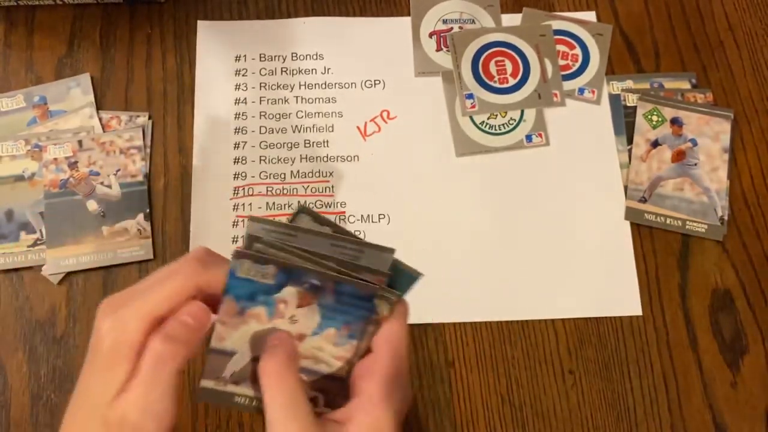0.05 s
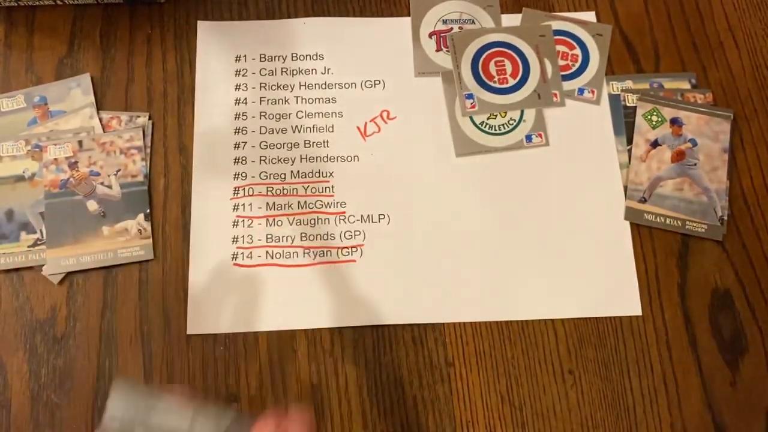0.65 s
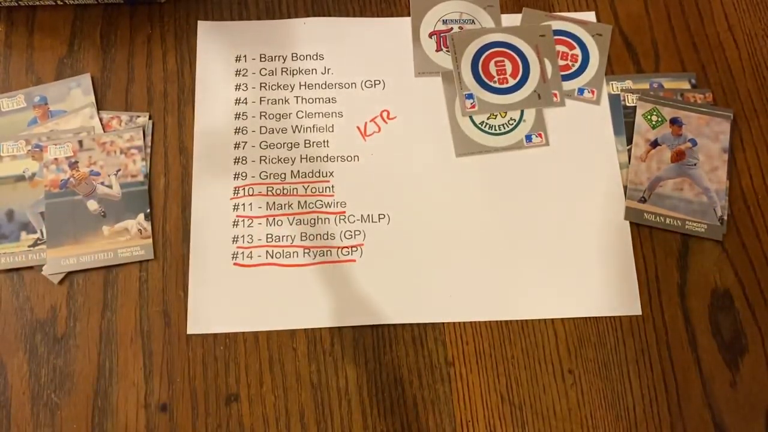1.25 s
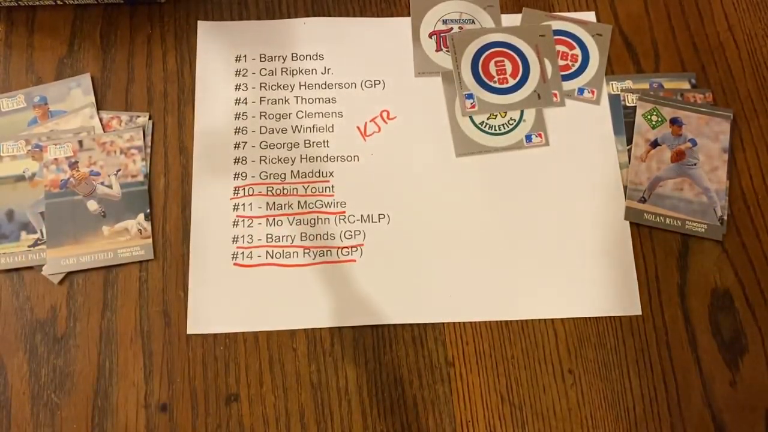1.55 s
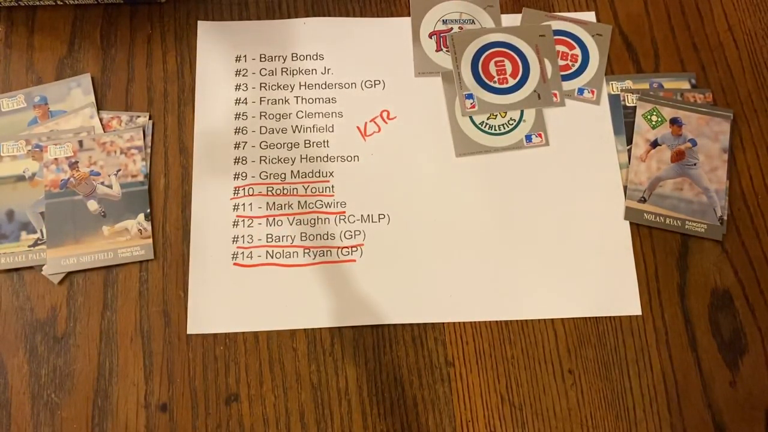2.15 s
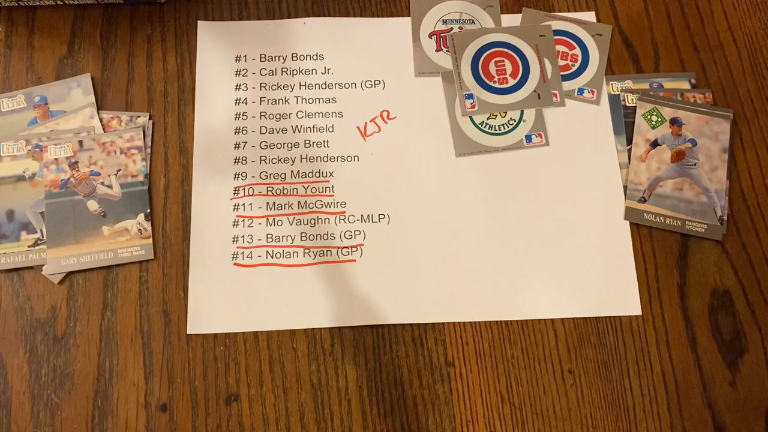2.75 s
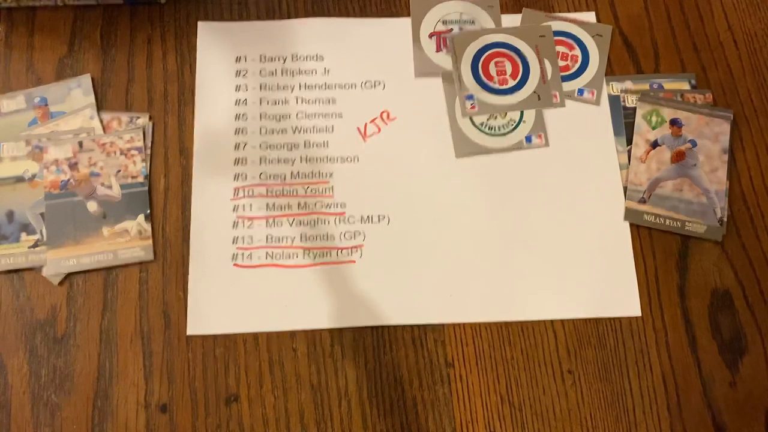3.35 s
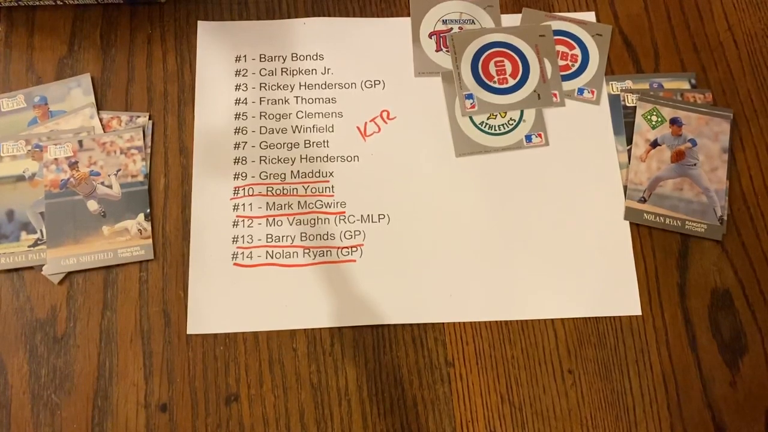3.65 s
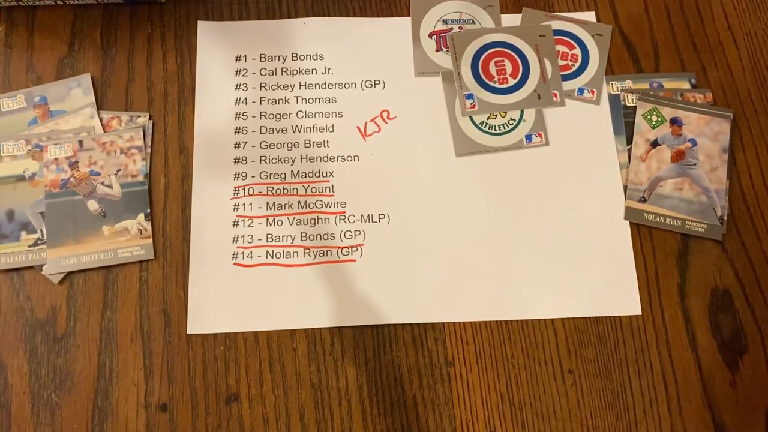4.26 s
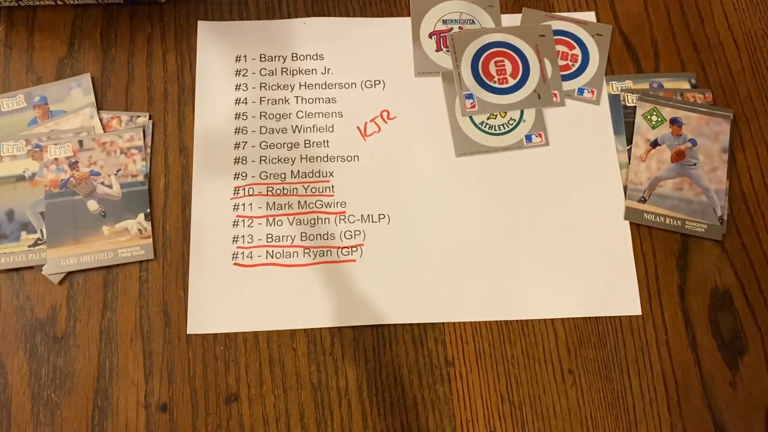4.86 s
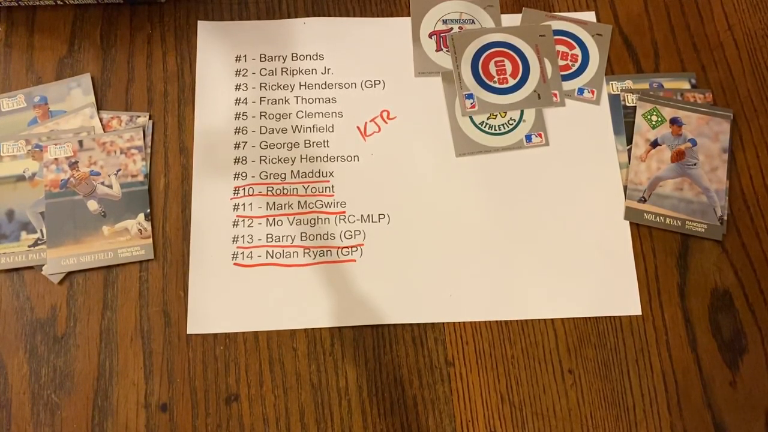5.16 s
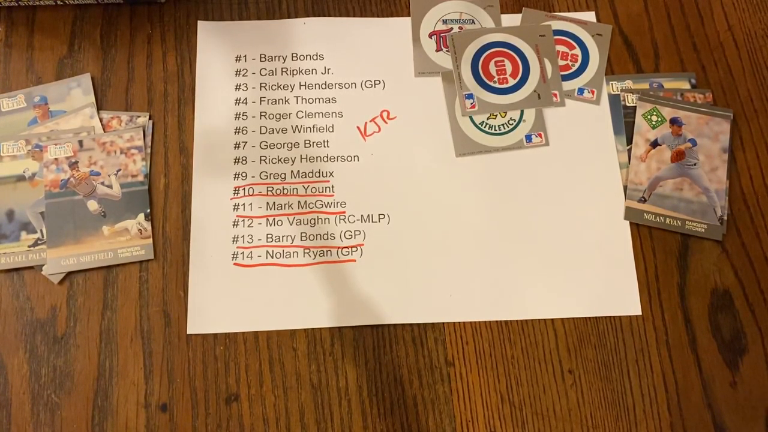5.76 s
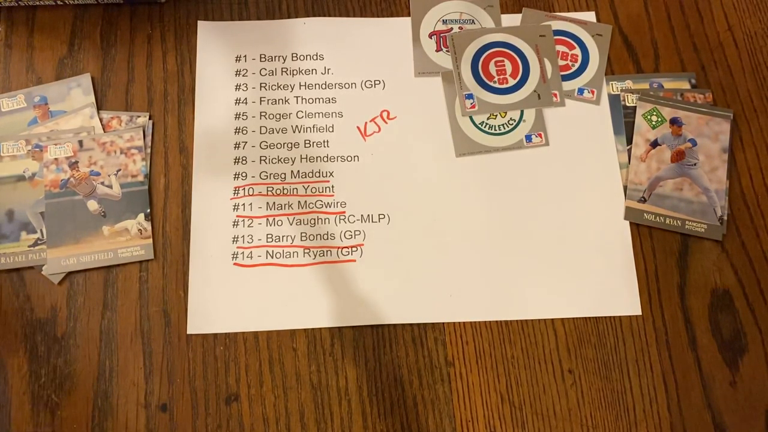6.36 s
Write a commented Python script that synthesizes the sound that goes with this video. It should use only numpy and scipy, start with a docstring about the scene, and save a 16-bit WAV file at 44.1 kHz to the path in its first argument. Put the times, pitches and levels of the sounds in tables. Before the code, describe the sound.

In a small, quiet room, stiff cards rub, scuff and flick against each other close to the microphone. The handling nearly stops, then a stack is put down on a wooden table twice: first with a dull, heavy thud, about a second later with a sharp knock. Cards go on sliding and snapping to the end, over a faint rumble from hands resting on the table.

```python
"""Trading cards are leafed through by hand over a wooden table in a small room.
From the start, faces slide with a stick-slip hiss and bent edges scuff and snap free.
Pushes on the table soon join in, carried through a stand as low thumps. After a lull,
a stack is set down near 3.2 s and again near 4.4 s, its sharp knock ringing the table top.
The leafing then goes on to the end."""
import sys
import numpy as np
from scipy import signal
from scipy.io import wavfile

SR = 44100
rng = np.random.default_rng(int(sys.argv[2]) if len(sys.argv) > 2 else 0)


def wav_record(signal):
    """Record a signal, one row per channel, as 16-bit PCM in the file named by sys.argv[1]."""
    frames = np.transpose(np.atleast_2d(signal))
    bounded = np.clip(frames, -1, 1)
    # unit amplitude maps onto the largest positive 16-bit level
    quanta = np.round(bounded * 32767).astype(np.int16)
    wavfile.write(sys.argv[1], SR, quanta)


N = 287309


def amp(db):
    """Converts decibels to an amplitude ratio."""
    return 10 ** (np.asarray(db) / 20)


def unit(x):
    """Normalises to rms 1."""
    return x / np.sqrt(np.mean(x ** 2) + 1e-20)


def read(points, hz):
    """Interpolates a table on a log-frequency axis."""
    f, value = np.transpose(points)
    return np.interp(np.log(hz + 1), np.log(f + 1), value)


def add(mix, s, sound):
    """Superposition: mixes a sound in at time s."""
    part = mix[max(round(s * SR), 0):][:len(sound)]
    part += sound[:len(part)]


def colour(x, spectrum, size=8192):
    """Minimum-phase filtering: imposes a spectral shape with a response of unit energy."""
    log_gain = np.log(amp(read(spectrum, abs(np.fft.fftfreq(size, 1 / SR)))))
    response = np.exp(np.conj(signal.hilbert(log_gain)))
    taps = np.fft.ifft(response).real[:size // 2]
    return signal.oaconvolve(x, taps / np.linalg.norm(taps))[:len(x)]


def resonate(x, hz, width_hz):
    """Resonance by heterodyning: shifts hz down to zero, smooths twice, shifts back."""
    carrier = np.exp(2j * np.pi * hz * np.arange(len(x)) / SR)
    pole = np.exp(-np.pi * width_hz / SR)
    return (carrier * signal.sosfilt([[1, 0, 0, 1, -pole, 0.0013]] * 2, x / carrier)).real


def grains(per_s, spread_db):
    """Shot noise: paper fibres slip in random clicks, a few much larger than the rest."""
    size = amp(spread_db * np.minimum(rng.exponential(1, N), 4))
    return unit(size * rng.choice([-1, 1], N) * (rng.random(N) < per_s / SR))


def stroke(length_s):
    """Velocity envelope of a short hand movement: quick swell, slower end."""
    return unit(np.sin(np.pi * np.linspace(0, 1, round(length_s * SR)) ** 0.38))


# spectrum of the room noise: frequency_hz, level_db
AMBIENT_SPECTRUM = [(20, -1.5), (40, -4), (75, -15.5), (110, -19.5), (180, -23.5), (400, -27.5), (825, -32),
                    (1600, -37.5), (3000, -41.5), (5600, -41), (9000, -45.5), (14000, -47.5), (16000, -57)]


def ambient_noise(level_db=-63.5):
    """Stationary noise: the room's quiet background, strongest in the bass."""
    return amp(level_db) * colour(rng.standard_normal(N), AMBIENT_SPECTRUM)


# spectrum of the table under resting hands: frequency_hz, level_db
RUMBLE_SPECTRUM = [(15, -27.5), (30, 7), (45, -3.5), (60, 5), (80, -12.5), (110, -2.5), (140, -30.5),
                   (250, -35.5), (600, -37), (2000, -60.5)]
# hands rest on the table: start_s, end_s
HAND_RESTS = [(0.0, 0.44), (3.2, 8)]


def resting_hands(level_db=-4, rest_db=-51.5, shift_db=-38.5, settle_t60_s=1.35, lift_s=0.06):
    """Random forcing: resting hands stir the table, more as they shift and settle after each push."""
    t = np.arange(N) / SR
    power = np.full(N, amp(rest_db) ** 2)
    settling = amp(-60 * t / settle_t60_s)
    for s, push_db, _ in PUSHES:
        add(power, s, (amp(shift_db + 0.3 * push_db) * settling) ** 2)
    contact = sum(np.clip(np.minimum(t - start, end - t) / lift_s + 1, 0, 1) for start, end in HAND_RESTS)
    return amp(level_db) * contact * np.sqrt(power) * colour(rng.standard_normal(N), RUMBLE_SPECTRUM)


# spectra of a sliding edge and of a card face: frequency_hz, level_db
HISS_SPECTRUM = [(200, -45), (1500, -20), (3000, -9.5), (4200, -0.5), (5500, 4), (7500, -8.5),
                 (10000, -16.5), (13000, -22), (16000, -38)]
FACE_SPECTRUM = [(100, -41), (400, -14), (900, -2), (1400, 2), (1900, 3.5), (2700, 1.5), (4000, -3),
                 (8000, -35), (16000, -56)]
# cards slide on each other: start_s, length_s, edge_hiss_db, face_rub_db
CARD_SLIDES = [(0.0, 0.037, -62.5, -64), (0.199, 0.21, -84, -69.5), (0.425, .22, -78, -74),
               (0.658, 0.34, -65, -66.5), (1.736, 0.4, -72.5, -75.5), (2.847, 0.14, -77, -79),
               (2.981, 0.068, -60.5, -86), (3.063, 0.096, -70, -61), (3.355, 0.17, -56.5, -69),
               (3.571, 0.23, -59, -58), (3.876, 0.15, -58.5, -61.5), (4.722, 0.19, -73, -70.5),
               (5.188, .16, -66, -67), (5.331, 0.27, -66.5, -75.5), (5.66, 0.14, -70, -63.5),
               (5.83, .11, -57.5, -61.5), (6.079, .16, -63, -70), (6.429, 0.11, -76, -65)]


def slides(level_db=-5, attack_s=0.0039, sag_db_per_s=-18.5, release_s=0.036):
    """Stick-slip friction: edges hiss and faces rub more dully as each slide starts, slows and stops."""
    hiss, rub = np.zeros((2, N))
    for s, length, edge_db, face_db in CARD_SLIDES:
        t = np.arange(0, length + release_s, 1 / SR)
        attack = np.minimum(t / attack_s, 1)
        release = np.minimum(1 - (t - length) / release_s, 1)
        speed = attack * release * amp(sag_db_per_s * t)
        add(hiss, s, amp(edge_db + level_db) * speed)
        add(rub, s, amp(face_db + level_db) * speed)
    hiss *= grains(per_s=7800, spread_db=4.5)
    rub *= grains(per_s=2000, spread_db=3)
    return colour(hiss, HISS_SPECTRUM) + colour(rub, FACE_SPECTRUM)


def catches(count=2, above_slide_db=14, range_db=7.5, chatter_db=-5):
    """Intermittent sticking: sliding edges catch at random, giving extra rows for snaps()."""
    rows = []
    for s, length, edge_db, face_db in CARD_SLIDES:
        loudest_db = max(edge_db, face_db) + above_slide_db
        for when, softness in rng.random((count, 2)):
            rows.append((s + length * when, loudest_db - range_db * softness, chatter_db))
    return rows


# spectrum of a card edge: frequency_hz, level_db
EDGE_SPECTRUM = [(200, -46), (1000, -31.5), (2500, -9), (4000, 3), (5600, 3.5), (7500, 2.5), (10000, -6),
                 (13000, -16.5), (16000, -21.5)]


def scuffs(length_s=0.019, edge_db=-8, face_db=-12):
    """Friction before release: an edge brushes along the next card, swelling into its snap."""
    speed = np.zeros(N)
    swell = np.linspace(0, 1, round(length_s * SR))
    for s, snap_db, _ in EDGE_SNAPS:
        relative_db = -19.5 - 0.58 * (snap_db - USUAL_SNAP_DB)  # further below a harder snap
        add(speed, s - length_s, amp(snap_db + relative_db) * swell)
    slips = speed * grains(per_s=6800, spread_db=3)
    return amp(edge_db) * colour(slips, EDGE_SPECTRUM) + amp(face_db) * colour(slips, FACE_SPECTRUM)


# spectrum of gliding glossy faces: frequency_hz, level_db
GLOSS_SPECTRUM = [(300, -47), (2000, -11.5), (4000, -2), (6000, 1), (8000, -0.5), (10000, -7),
                  (13000, -11.5), (16000, -23)]
# one card glides quickly off the next: start_s, level_db, length_s
CARD_SWISHES = [(0.121, -60, 0.05), (0.195, -61, 0.025), (0.76, -55, 0.032), (0.829, -57.5, 0.033),
                (1.124, -45.5, 0.011), (1.746, -74, 0.02), (1.9, -75.5, 0.049), (2.214, -75.5, .057),
                (2.629, -72.5, 0.031), (3.054, -56, 0.12), (3.18, -51, .043), (3.43, -55, 0.039),
                (3.553, -59.5, 0.12), (3.72, -59, 0.04), (5.226, -64.5, 0.038), (5.711, -62, 0.041),
                (6.06, -53, 0.023)]


def swishes(level_db=-3):
    """Microslip: glossy faces glide apart in very uneven slips, giving a fine, bright crackle."""
    speed = np.zeros(N)
    for s, db, length in CARD_SWISHES:
        add(speed, s, amp(db + level_db) * stroke(length))
    return colour(speed * grains(per_s=5000, spread_db=14), GLOSS_SPECTRUM)


# a card edge snaps free: start_s, level_db, relative_chatter_db
EDGE_SNAPS = [(.127, -44, -8), (0.233, -44.5, -17), (.296, -42.5, -11), (.652, -41, -25), (0.696, -44, -11),
              (.766, -49, -15), (.923, -43.5, -9), (0.931, -35, -4), (1.108, -45, 0), (1.124, -39.5, -6),
              (1.132, -32, -10), (1.251, -49.5, -17), (1.555, -70, 2), (1.728, -58, 0.5), (2.684, -67, -13),
              (2.814, -67.5, -16), (2.971, -39.5, -2), (3.066, -35.5, -12), (3.121, -39, -10),
              (3.19, -30, 0.5), (3.355, -41, 4.5), (3.409, -41.5, -6), (3.455, -42.5, 2),
              (3.650, -42.5, -3), (3.739, -46, -18), (3.754, -39, 1.5), (3.835, -42, -1.5),
              (3.941, -35.5, -5), (4.162, -53.5, -1), (4.298, -60, 10), (4.377, -41, -4),
              (4.411, -28.5, -2.5), (4.835, -47.5, -3.5), (5.006, -50.5, -1.5), (5.081, -38, -14),
              (5.196, -47, -10), (5.243, -45.5, -16), (5.663, -54.5, -3), (5.727, -46, -12),
              (5.787, -41, -21), (5.827, -37.5, -4), (5.896, -34, -15), (6.031, -37, -7), (6.044, -36, -14),
              (6.074, -34.5, -2.5), (6.249, -52, 4.5), (6.38, -51, -8), (6.419, -46, -13), (6.442, -47, -4)]
USUAL_SNAP_DB = -42.5


def snaps(level_db=15, crack_db=-2, crack_t60_s=0.0036, chatter_t60_s=0.026, flex_t60_s=0.016,
          ping_db=-3, ping_hz=5600, ping_s=0.00017):
    """Elastic release: the edge cracks and pings; the face shudders and chatters on its neighbours."""
    t = np.arange(SR // 6) / SR
    edge, face, pings = np.zeros((3, N))
    slips = grains(per_s=4200, spread_db=1.5)
    for s, db, chatter_db in EDGE_SNAPS + catches():
        size = amp(db + level_db) / np.sqrt(len(t))
        crack = unit(np.sign(rng.standard_normal(len(t))) * amp(-60 * t / crack_t60_s))
        shudder = unit(rng.standard_normal(len(t)) * amp(-60 * t / flex_t60_s))
        hz = ping_hz * 2 ** rng.uniform(-0.18, 0.18)  # each edge has its own pitch
        ping = unit(t * np.exp(-t / ping_s) * np.sin(2 * np.pi * hz * t))
        contacts = np.roll(slips, -round(s * SR))[:len(t)]
        chatter = amp(chatter_db) * unit(contacts * amp(-60 * t / chatter_t60_s))
        # hard, clean flicks are thin and bright; soft, chattering ones have more body
        flex_db = -7.5 - 0.14 * (db - USUAL_SNAP_DB) + 0.41 * chatter_db
        add(pings, s, size * amp(ping_db) * ping)
        add(edge, s, size * (amp(crack_db) * crack + chatter))
        add(face, s, size * amp(flex_db) * (shudder - chatter))
    return colour(edge, EDGE_SPECTRUM) + colour(face, FACE_SPECTRUM) + pings


# a card or finger drags on a bent card: start_s, level_db, pitch_hz, length_s
CARD_SCRAPES = [(0.198, -71, 2240, .05), (0.344, -71, 303, 0.053), (0.44, -68, 1100, 0.036),
                (0.664, -69, 1560, 0.026), (.841, -62.5, 2050, 0.037), (1.127, -59, 810, 0.051),
                (1.356, -75, 405, 0.076), (1.591, -75.5, 1520, 0.083), (3.058, -51.5, 1900, 0.041),
                (3.357, -55.5, 2400, 0.028), (3.426, -63.5, 990, .078), (3.648, -49, 2600, 0.038),
                (3.748, -55.5, 1260, 0.032), (3.916, -59.5, 1690, 0.032), (3.937, -47.5, 2040, 0.037),
                (5.82, -66, 560, 0.05), (6.043, -58, 1690, 0.065), (6.066, -56.5, 334, 0.029),
                (6.157, -70.5, 1770, 0.26), (6.429, -59, 2130, 0.071)]


def scrapes(level_db=-4, least_width_hz=166, width_share=0.28):
    """Friction-driven resonance: a short drag excites one mode of the bent card, wider when higher."""
    out = np.zeros(N)
    for s, db, hz, length in CARD_SCRAPES:
        speed = stroke(length)
        drag = resonate(rng.standard_normal(SR // 2), hz, least_width_hz + width_share * hz)
        add(out, s, amp(db + level_db) * unit(speed * drag[-len(speed):]))
    return out


# low modes of table and stand: pitch_hz, level_db, t60_s
LOW_MODES = [(29.6, -14, 0.85), (35.7, -10, 0.2), (61.1, 1.5, 0.19), (109, 2, 0.3), (165, -20, 0.16)]
# pushes on the table: start_s, level_db, contact_s
PUSHES = [(0.319, -32.5, 0.015), (0.342, -21.5, 0.015), (0.357, -27, 0.011), (0.381, -15, 0.021),
          (.455, -14.5, 0.022), (.477, -28, .014), (2.428, -36.5, 0.021), (3.199, 3, .014),
          (3.22, -4, .015), (3.739, -25.5, 0.022), (3.905, -25.5, 0.017), (3.939, -26, 0.012),
          (4.174, -19.5, 0.016), (4.386, -22.5, 0.0092), (4.415, -9.5, .0095), (4.435, -10, 0.014),
          (4.469, -15.5, 0.0098), (5.197, -38, 0.0096), (5.512, -36, .012), (5.956, -25.5, .017),
          (6.176, -21.5, .01), (6.404, -32.5, .012)]


def thumps(level_db=-3.5):
    """Structure-borne sound: force pulses excite the low modes; longer contact gives a duller thump."""
    t = np.arange(SR) / SR
    force = np.zeros(N)
    for s, db, contact_s in PUSHES:
        pulse = np.sin(np.pi * np.minimum(t[:SR // 20] / contact_s, 1)) ** 2
        add(force, s, amp(db) * pulse / pulse.sum())
    response = sum(amp(db - 60 * t / t60) * np.cos(2 * np.pi * hz * t) for hz, db, t60 in LOW_MODES)
    return amp(level_db) * signal.oaconvolve(force, response)[:N]


# the stand is jolted: start_s, level_db, frequency_hz, t60_s
STAND_SWAYS = [(0.456, -35, 6.1, 9.6), (3.27, -35, 6.6, 5.6)]


def sways():
    """Damped oscillation: the jolted stand sways at an infrasonic frequency."""
    t = np.arange(N) / SR
    out = np.zeros(N)
    for s, db, hz, t60 in STAND_SWAYS:
        add(out, s, amp(db - 60 * t / t60) * np.sin(2 * np.pi * hz * t))
    return out


# spectrum of struck wood: frequency_hz, level_db
WOOD_SPECTRUM = [(60, -27), (170, 1.5), (400, -1), (700, 0), (900, -1), (1400, 3.5), (2200, -1.5),
                 (3300, -9.5), (5000, -20), (8000, -25.5), (16000, -60)]
# broad resonances of a stack's hollow clack: pitch_hz, width_hz, level_db
STACK_RESONANCES = [(524, 120, -3.5), (1124, 180, 3), (1840, 300, -1), (2880, 630, 1.5), (3670, 350, 3),
                    (4950, 310, 6), (6130, 430, 7.5), (7850, 130, -1), (10300, 190, -14), (11600, 350, -34),
                    (13800, 410, -41)]
# cards land: start_s, slap_db, wood_db, ring_db, clack_db, clack_tilt_db_per_octave, rise_s, t60_s
LANDINGS = [(1.127, -39.5, -67, -71, -54, -3, 0.027, 0.13), (3.183, -33, -34, -73, -62, -10, 0.0077, 0.19),
            (4.164, -79, -68, -81, -50, -6.5, 0.0021, 0.4),
            (4.379, -62, -40, -47.5, -41.5, 1.5, 0.0012, 0.48),
            (4.410, -64, -26.5, -31, -37.5, 12, 0.0031, 0.22),
            (4.467, -52, -53, -44, -40.5, -8.5, 0.0042, 0.28)]


def knocks(level_db=-6):
    """Multiple impact: cards land in a shower of blows; faces slap, wood knocks and the stack clacks."""
    t = np.arange(SR * 3 // 4) / SR
    slap, wood, clack = np.zeros((3, N))
    for s, slap_db, wood_db, _, clack_db, tilt, rise_s, t60 in LANDINGS:
        blows = np.minimum(t / rise_s, 1) * amp(-60 * np.maximum(t - rise_s, 0) / t60)
        hollow = np.zeros(len(t))
        for hz, width_hz, db in STACK_RESONANCES:
            band = unit(resonate(rng.standard_normal(len(t)), hz, width_hz))
            hollow += amp(db + tilt * np.log2(hz)) * band
        add(slap, s, amp(slap_db) * blows)
        add(wood, s, amp(wood_db) * blows)
        add(clack, s, amp(clack_db) * blows * unit(hollow))
    slap *= grains(per_s=6200, spread_db=6)
    wood *= grains(per_s=4000, spread_db=4.5)
    return amp(level_db) * (colour(slap, HISS_SPECTRUM) + colour(wood, WOOD_SPECTRUM) + clack)


# modes of the table top: pitch_hz, level_db, t60_s
TOP_MODES = [(199.5, -14, 0.33), (249, -18, 0.39), (311, 2, 0.39), (497, -3.5, 0.47), (615, -5, 0.2),
             (693, -27, 0.15), (922, -21, 0.93), (1082, 2, 0.32), (1350, 6, 0.39), (1510, -8, 0.24),
             (1810, -26, 0.5), (1980, -13, 0.4), (2208, -7.5, 0.17), (2370, 5, 0.2), (5960, -10, 0.46)]


def table_ring(level_db=-9.5, rise_s=0.0025):
    """Free vibration: after a landing, each mode of the table top decays at its own rate."""
    t = np.arange(SR * 3 // 4) / SR
    onset = 1 - np.exp(-t / rise_s)
    out = np.zeros(N)
    for s, _, _, ring_db, *_ in LANDINGS:
        for hz, db, t60 in TOP_MODES:
            mode = amp(db - 60 * t / t60) * np.sin(2 * np.pi * (hz * t + rng.random()))
            add(out, s, amp(ring_db + level_db) * onset * mode)
    return out


# echoes from nearby surfaces: delay_s, level_db
EARLY_REFLECTIONS = [(.0007, -47), (.0069, -13.5), (0.0092, -25.5), (0.0124, -9.5)]
# reverberation time of the room: frequency_hz, t60_s
ROOM_DECAY = [(200, 0.31), (530, 0.41), (1400, 0.43), (4000, 0.38), (7000, 0.27), (14000, 0.35)]


def room(x, build_up_s=0.0023, tails=3, crossfade_hz=10):
    """Reverberation: early reflections, then a smooth, diffuse decay of steadily crossfaded noise tails."""
    out = np.zeros(N)
    for delay_s, db in EARLY_REFLECTIONS:
        add(out, delay_s, amp(db) * x)
    t = np.arange(N) / SR
    for k in range(tails):
        hz, frame_s, bands = signal.stft(rng.standard_normal(SR * 2 // 3), SR, nperseg=256)
        decay = amp(-60 * frame_s / read(ROOM_DECAY, hz)[:, None])
        tail = signal.istft(bands * decay, SR, nperseg=256)[1]
        tail *= 1 - np.exp(-(t[:len(tail)] / build_up_s) ** 2)
        # the tails take turns at constant total power
        share = np.cos(np.pi * (2 * crossfade_hz * t + k / tails)) * np.sqrt(2 / tails)
        out += signal.oaconvolve(x * share, tail / np.linalg.norm(tail))[:N]
    return out


def scene():
    """Superposition of room noise, the cards with their reverberation, and the vibrating table."""
    cards = slides() + scuffs() + swishes() + snaps() + scrapes() + knocks()
    table = resting_hands() + thumps() + sways() + table_ring()
    return (ambient_noise() + cards + room(cards) + table)[None]


def record(dry, cutoff_hz=16300):
    """Band limiting: a steep low-pass filter removes the highest treble."""
    taps = signal.firwin(511, cutoff_hz, window=("kaiser", 9), fs=SR)
    return signal.oaconvolve(dry, taps[None], "same")


dry = scene()
out = record(dry)
wav_record(out)
```